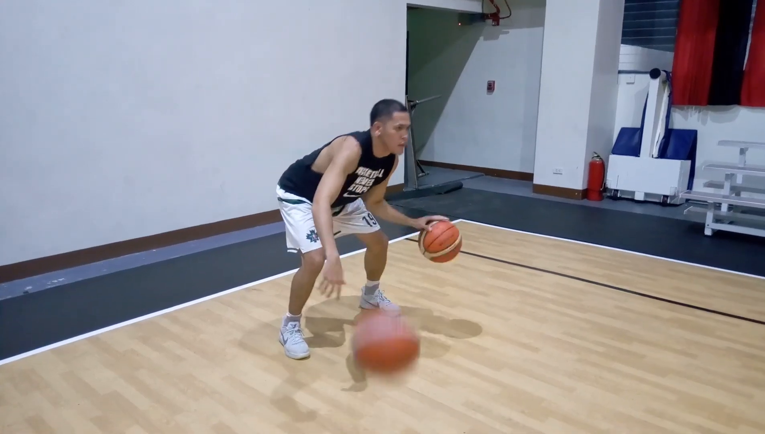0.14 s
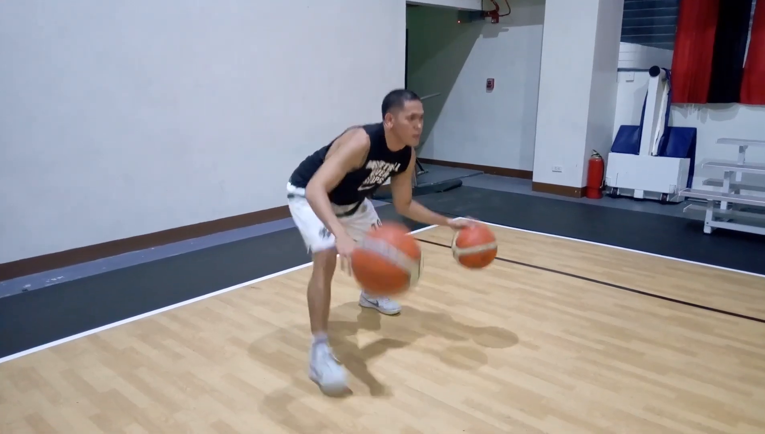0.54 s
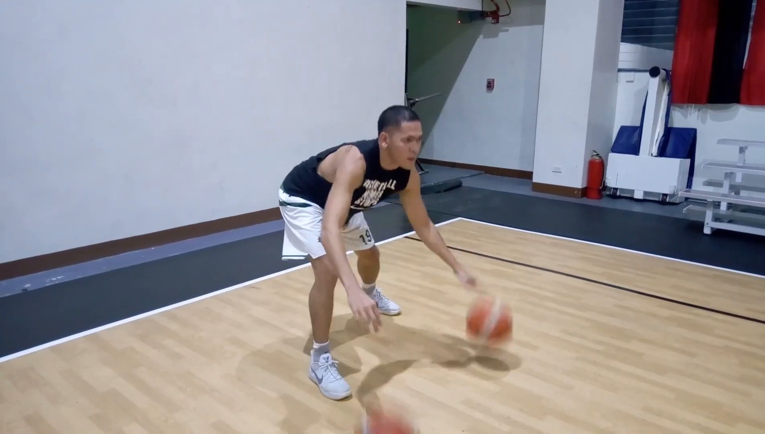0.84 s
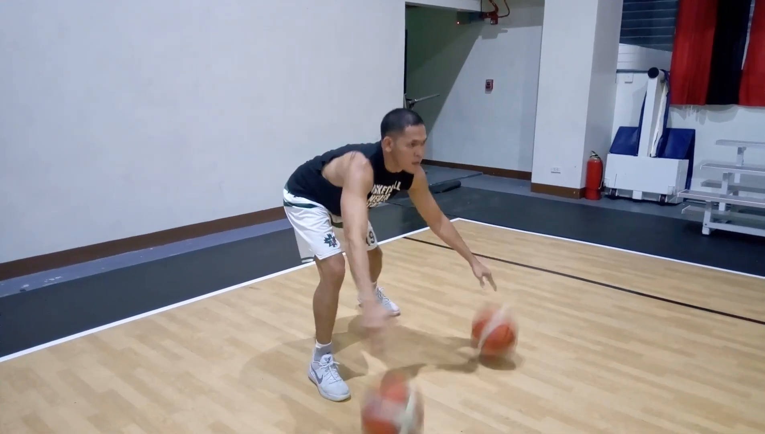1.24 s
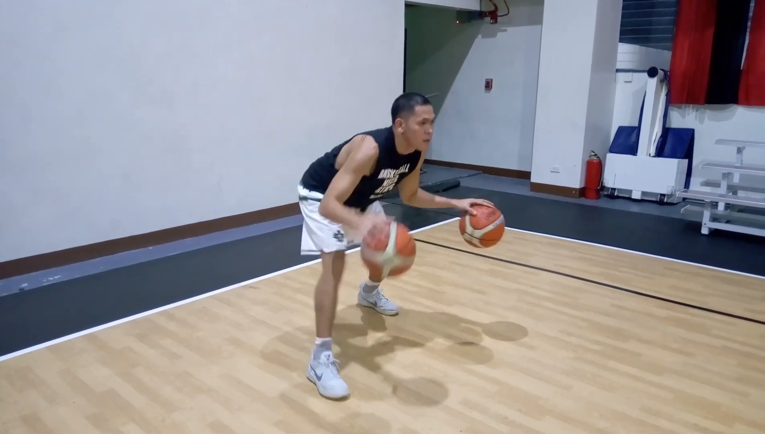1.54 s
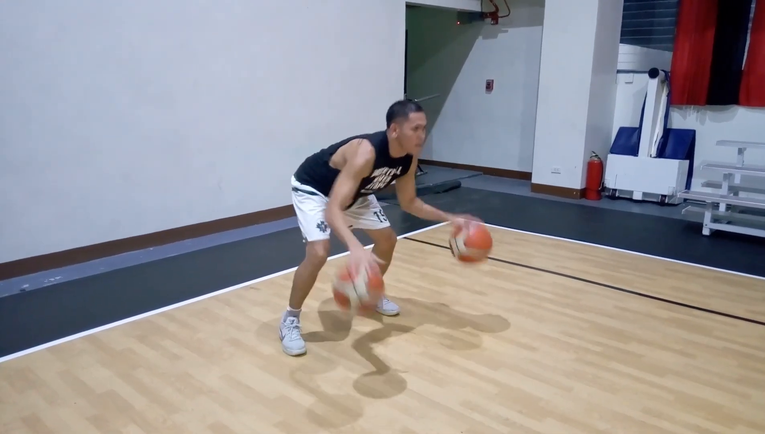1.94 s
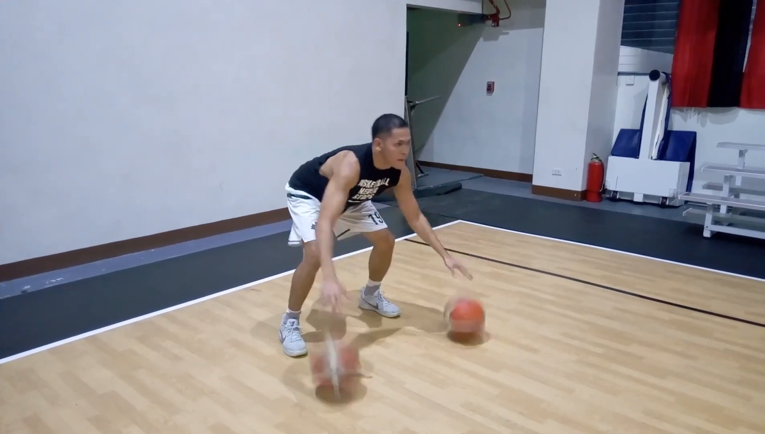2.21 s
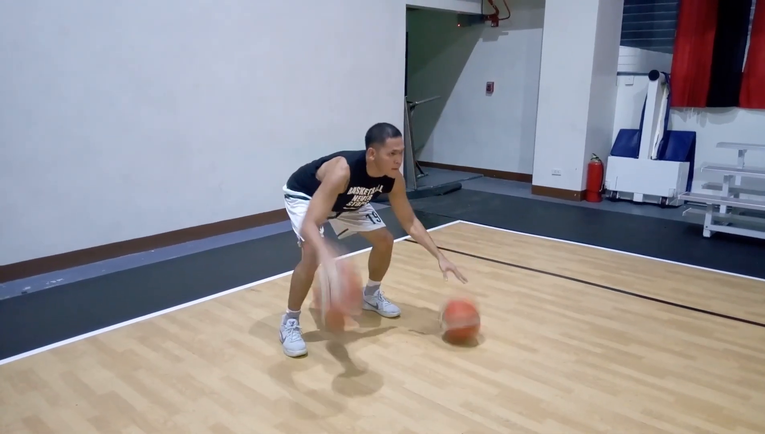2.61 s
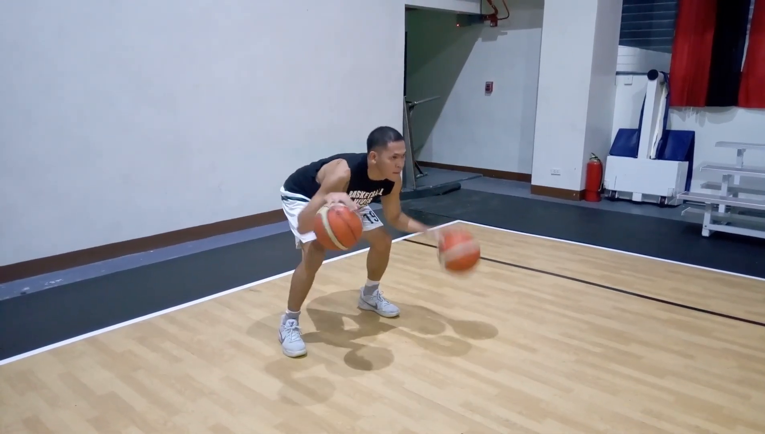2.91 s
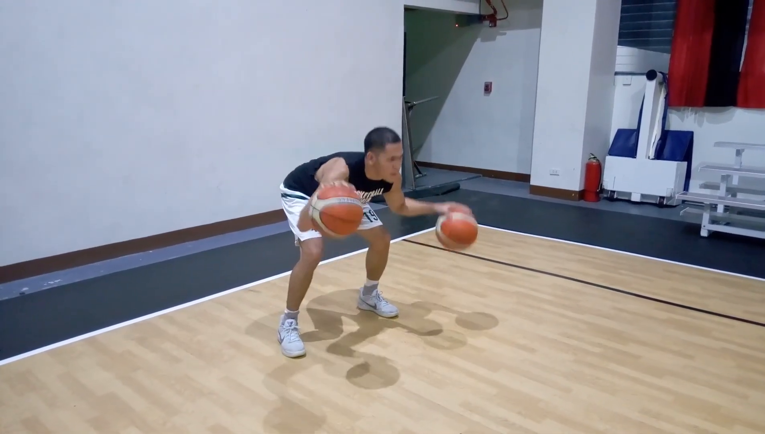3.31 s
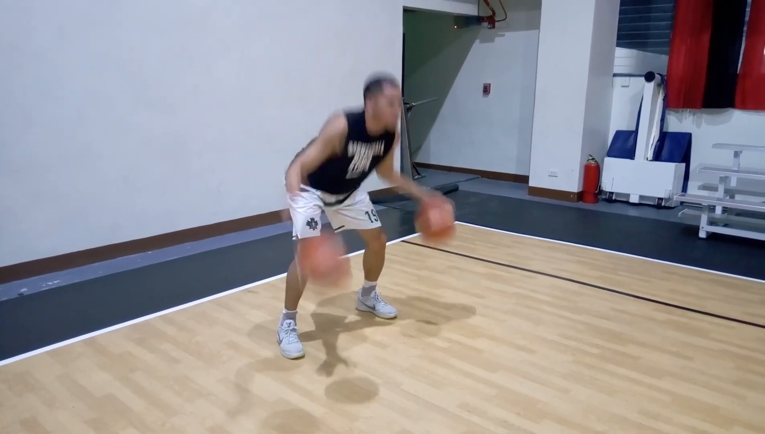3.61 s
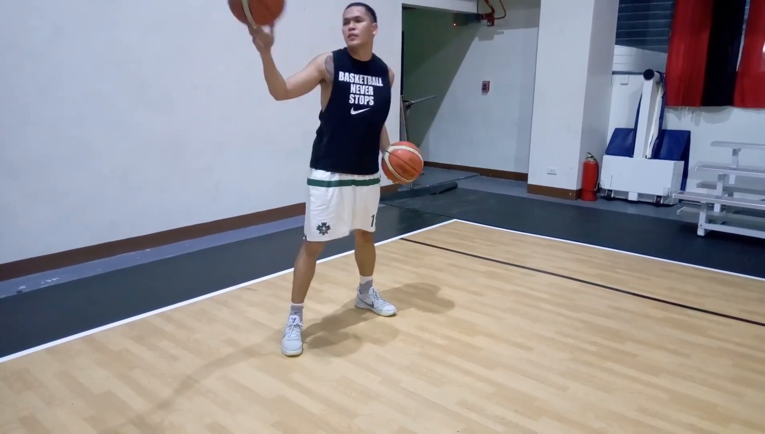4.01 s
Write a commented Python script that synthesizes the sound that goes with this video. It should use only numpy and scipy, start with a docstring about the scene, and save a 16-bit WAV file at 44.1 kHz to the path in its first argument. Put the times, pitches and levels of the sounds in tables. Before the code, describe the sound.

In a reverberant gym, two basketballs bounce on a wooden floor in an uneven, overlapping rhythm. Each hit is a sharp slap with a short hollow ring and a low thud, with duller knocks between. A shoe squeaks very briefly near one second and again near two. Echoes from earlier dribbling already hang in the air at the start; a low room rumble continues. Microphone at a moderate distance, ball hits central, reverberation spread in stereo.

```python
"""A gym hums with a steady rumble, and an earlier round of dribbling still rings in it as the scene opens.
Basketballs hit the wooden floor or a hand in an uneven rhythm, among dull thumps; a shoe squeaks at 1.2 s and 1.9 s.
Each hit is a sharp slap, a short ring of dying sines for the ball and a low thud.
Each squeak is a wavering tone with three harmonics, as rubber sticks and slips.
Dense reflections start almost at once; a near wall, single echoes and the hall's long tail join in."""
import sys
import numpy as np
from scipy import signal
from scipy.io import wavfile
from scipy.ndimage import uniform_filter1d

SR = 44100
rng = np.random.default_rng(int(sys.argv[2]) if len(sys.argv) > 2 else 0)


def output_pcm(signal):
    """Save a mono or channel-first signal as 16-bit PCM at the path in sys.argv[1].

    Samples are clipped to [-1, 1] before scaling.
    """
    pcm = np.clip(np.atleast_2d(signal).T, -1, 1) * 32767
    wavfile.write(sys.argv[1], SR, np.round(pcm).astype(np.int16))


N = 183279

# Ways the floor boards vibrate under a hit or a thump.
# Columns: multiple of the floor pitch [ratio], level_db [dB against the other modes], t60_s [s to fall 60 dB]
FLOOR_MODES = [(.7, 5.5, 0.052), (1.0, -3.5, 0.074), (1.4, -24, 0.039), (1.95, -17, 0.15),
               (2.9, 3.5, 0.0087)]


def gain_of(db):
    """Turns decibels into a factor for the wave."""
    return 10 ** (np.asarray(db) / 20)


def read(hz, points, column=1):
    """Reads a table column at any frequency, with straight lines between points on a log-frequency axis."""
    table = np.transpose(points)
    return np.interp(np.log(hz + 1), np.log(table[0] + 1), table[column])


def add(mix, s, sound):
    """Mixes a sound in at time s, cutting off what runs past the end."""
    part = mix[round(s * SR):][:len(sound)]
    part += sound[:len(part)]


def ring(modes, scale, tilt_db=0, size=6000):
    """A struck body: sines start together and die away, each at its own scaled pitch; the peak is 1."""
    t = np.arange(size) / SR
    out = np.zeros(size)
    for (f, db, t60), k in zip(modes, scale):
        level_db = db + tilt_db * np.log2(f) - 60 * t / t60  # tilt is in dB per octave
        out += gain_of(level_db) * np.sin(2 * np.pi * f * k * t)
    return out / abs(out).max()


def pair(hz, common, difference):
    """Spectra for two microphone ports: a shared part, plus a part that has opposite signs left and right."""
    # How strong the differing part is. Columns: frequency_hz [Hz], level_db [dB against the shared part]
    apart_table = [(100, -20), (1000, -14.5), (4000, -12.5), (11000, -39)]
    apart = gain_of(read(hz, apart_table))[:, None] * difference
    return np.array([common + apart, common - apart])


def rumble():
    """Steady noise of the hall, made from random spectra whose level drifts in patches of time and pitch."""
    # Colour of the noise. Columns: frequency_hz [Hz], level_db [relative dB per Hz]
    colour = [(20, -54), (75, 8.5), (125, 2.5), (300, -16), (480, -17), (750, -10.5), (2000, -21.5),
              (5000, -28), (12000, -29)]
    level_db = -46.5  # average (RMS) level
    frames, hz = N // 256 + 5, np.fft.rfftfreq(1024, 1 / SR)
    a, b, c, d, patches = rng.standard_normal((frames, 513, 5)).T
    patches = uniform_filter1d(patches, size=10, axis=0)  # smooth across pitch
    patches = uniform_filter1d(patches, size=10, axis=1) * 10  # then time; 10 restores the spread
    spectra = pair(hz, a + 1j * b, c + 1j * d)
    spectra *= gain_of(read(hz, colour)[:, None] + 1.76 * patches)
    out = signal.istft(spectra, nperseg=1024, noverlap=768)[1][:, :N]
    return gain_of(level_db) * out / out.std()


def tail(bands, start_s, seconds, scatter_db):
    """Many reflections as sparse random taps, one in every 16 samples; each band has its own level and decay."""
    slots = np.arange(0, 2 * SR, 16)
    taps = np.zeros((2, 2 * SR + 16))
    at = slots + rng.integers(0, 16, (2, len(slots)))
    signs = rng.choice([-1., 1.], at.shape)
    sizes = gain_of(scatter_db * np.minimum(rng.exponential(1, at.shape), 4))
    np.put_along_axis(taps, at, signs * sizes, 1)
    hz, t, spectra = signal.stft(taps / taps.std(), SR, nperseg=256)
    t60 = read(hz, bands, column=2)[:, None]
    energy = t60 * SR / (6 * np.log(10))  # dividing by its root makes levels independent of decay time
    fading = gain_of(read(hz, bands)[:, None] - 60 * t / t60) / np.sqrt(energy)
    out = signal.istft(pair(hz, *spectra) * fading, SR, nperseg=256)[1][:, :seconds * SR]
    fade_in = np.clip((np.arange(out.shape[1]) / SR - start_s) / 0.0018, 0, 1)
    return out * fade_in


def hall(x):
    """The room's answer: dense reflections, single echoes with cut treble and a long tail, their pattern turning."""
    # Single echoes. Columns: delay_ms [ms], level_db [dB against the sound], upper_edge_hz [Hz, at most 20000 used]
    echoes = [(23.1, -51, 27000), (43.76, -16, 5000), (183.5, -17.5, 310)]
    # Dense early reflections. Columns: frequency_hz [Hz], level_db [dB], t60_s [s to fall 60 dB]
    early = [(61, 5.5, 0.17), (198, -12, 0.67), (478, 2, 0.37), (725, -4.5, 0.21), (1300, 3.5, 0.17),
             (2140, 0.5, 0.45), (5200, -7, 0.28), (11100, -4.5, 0.24)]
    # Long tail of the hall. Columns: frequency_hz [Hz], level_db [dB], t60_s [s to fall 60 dB]
    late = [(60, -32, 2.8), (204, -18, 9), (484, -7, 1.26), (760, -5.5, 0.45), (1280, -6.5, 1.04),
            (2550, -10, 4.9), (4400, -4, 0.7), (11100, -12, 1.24)]
    earlier_round = x[2 * SR:round(2.7 * SR)]  # goes in front, so that its ringing reaches the opening
    x = np.concatenate([earlier_round, x])
    out = np.zeros((2, len(x)))
    for delay_ms, db, edge_hz in echoes:
        echo = signal.lfilter(*signal.butter(2, min(edge_hz, 20000), fs=SR), x)
        delay = round(delay_ms * SR / 1000)
        out[:, delay:] += gain_of(db) * echo[:-delay]
    turn = 2 * np.pi * np.arange(len(x)) / SR / 0.34  # one turn in 0.34 s
    for k in range(3):
        # Three random patterns trade places over time, so hits do not all echo alike.
        share = np.sqrt(2 / 3) * np.cos(turn + k * np.pi / 3)  # the three squares sum to 1
        pattern = tail(late, 0.021, seconds=2, scatter_db=3.5)
        pattern[:, :SR] += tail(early, 0.00048, seconds=1, scatter_db=5.0)
        out += signal.fftconvolve((x * share)[None], pattern, axes=1)[:, :len(x)]
    return out[:, -N:]


def thumps():
    """Dull knocks without a slap: the floor modes alone, with a softened start."""
    # Columns: start_s [s], level_db [dB, before the soft start]
    thump_table = [(0.264, -18), (0.352, -21.5), (0.557, -18.5), (1.072, -41), (1.109, -28), (1.376, -20.5),
                   (1.566, -19.5), (2.175, -25), (3.019, -27.5), (3.187, -19), (3.41, -24), (3.465, -21.5),
                   (3.953, -21)]
    pitch_hz, pitch_spread, rise_s = 119.2, 0.038, 0.0059  # the spread is a share of the pitch
    out = np.zeros(N)
    for s, db in thump_table:
        detune = 1 + pitch_spread * rng.standard_normal(len(FLOOR_MODES))
        thud = ring(FLOOR_MODES, pitch_hz * detune)
        soft_start = np.minimum(np.arange(len(thud)) / SR / rise_s, 1)
        add(out, s, gain_of(db) * thud * soft_start)
    return out


def shoe():
    """Rubber sticks and slips thousands of times a second, unevenly, slowing as the foot stops."""
    # One row a slip of the sole. Columns: start_s [s], length_s [s], swell_s [s], first_rate_hz [Hz, before waver],
    # last_rate_hz [Hz, before waver], slowing [share of the length], level_db [dB], step_db [dB per harmonic],
    # unevenness [0-1], hall_db [dB sent into the hall], wall_db [dB sent to the near walls]
    slips = [(1.172, .033, 0.011, 4270, 2994, 0.91, -30, 5.5, 0.2, -1, -9),
             (1.939, 0.03, 0.0035, 5250, 4530, 0.92, -31.5, 0.5, 0.54, -1, -21),
             (1.945, .048, 0.012, 4216, 3678, 0.81, -30.5, -5.5, .55, 5.5, -7)]
    # What the rubber sends out. Columns: frequency_hz [Hz], level_db [dB]
    sole = [(3000, -15), (3700, -7.5), (5000, -5.5), (6300, -19), (7300, -3.5), (8200, 2.5), (9400, -5),
            (10500, -16), (12500, -36)]
    # Echoes of the squeak off near walls. Columns: delay_s [s], level_db [dB, added to wall_db]
    squeak_echoes = [(.018, -9), (.0235, -14), (.0305, -9), (.041, -13)]
    slowing_bend, fall_s = 1.44, 0.016  # the slip rate drops fast at first, then levels off
    near, walls, far = np.zeros((3, N))
    for s, length, swell_s, first_hz, last_hz, slowing, db, step_db, rough, hall_db, wall_db in slips:
        t = np.arange(0, length, 1 / SR)
        noise = uniform_filter1d(rng.standard_normal((2, 3000)), size=50)
        waver, flutter = noise[:, :len(t)] * rough  # for pitch and loudness
        still_to_slow = np.maximum(1 - t / (slowing * length), 0) ** slowing_bend
        hz = last_hz + (first_hz - last_hz) * still_to_slow
        turns = np.cumsum(hz * (1 + 0.572 * waver)) / SR
        tone = np.zeros(len(t))
        for k in (1, 2, 3):
            harmonic_db = db + step_db * (k - 1.5) + read(k * hz, sole)
            tone += gain_of(harmonic_db) * np.sin(2 * np.pi * k * turns)
        swell_and_fall = np.minimum(np.minimum(t / swell_s, (length - t) / fall_s), 1)
        tone *= gain_of(16.6 * flutter) * swell_and_fall
        add(near, s, tone)
        add(far, s, gain_of(hall_db) * tone)
        for delay_s, echo_db in squeak_echoes:
            add(walls, s + delay_s, gain_of(wall_db + echo_db) * tone)
    return near + walls, far


def ball_slap(t, lead, contact_ms, skin_db):
    """The ball hits: pressure dips sharply and overshoots, then the pebbled skin crackles."""
    u = (t - lead) * 1000 / contact_ms  # time counted in contact times
    dip = np.exp(-u ** 2 / 2) - .15 * np.exp(-(u - 2.5) ** 2 / 4)
    grit = np.diff(rng.standard_normal(len(t) + 1))
    crackle = gain_of(skin_db) * grit * (u > 2) * gain_of(-60 * t / .011)
    no_bass = signal.butter(1, 300, "high", fs=SR, output="sos")  # a small contact patch sends out no bass
    return signal.sosfilt(no_bass, crackle - dip)


def ball_ring(detune, tilt_db):
    """Air and shell of the ball ring briefly, with little sound below the lowest mode."""
    # Columns: pitch_hz [Hz, before detuning], level_db [dB, before the tilt], t60_s [s to fall 60 dB]
    ball_modes = [(770, -1.5, .019), (980, -7, .013), (1190, 0, .018), (1450, -4, .014), (1720, -7, .013),
                  (2200, -11, .011), (2800, -16, .009)]
    bright = -ring(ball_modes, detune, tilt_db)
    return signal.sosfilt(signal.butter(2, 500, "high", fs=SR, output="sos"), bright)


def floor_thud(pitches_hz, delay_s):
    """The ball flattens for a few ms, a soft push that rouses only the low modes of the floor."""
    thud = ring(FLOOR_MODES, pitches_hz)
    thud = signal.sosfilt(signal.butter(2, 420, fs=SR, output="sos"), thud)
    return np.roll(thud, round(delay_s * SR))


def balls():
    """Slap, ring and thud of each hit, and apart from them what comes back off the near wall."""
    # One row a hit: a bounce, a hand catch or a strong echo. Columns: start_s [s], slap_db [dB, before filtering],
    # contact_ms [ms], ring_db [dB, before filtering], thud_db [dB, before filtering],
    # floor_pitch_hz [Hz, before detuning], wall_db [dB of the near-wall echo against the hit]
    hits = [(0.0519, -26, 0.11, -22, -24.5, 131, -8.5), (0.1507, -13, 0.078, -12.5, -16.5, 179, -12),
            (0.1546, -13.5, 0.056, -36, -17.5, 176, -10), (0.2167, -10.5, 0.082, -38, -18.5, 90.6, -14),
            (0.2253, -14.5, .05, -23, -19, 115.4, -22), (0.301, -23.5, 0.095, -45, -27.5, 87, -11),
            (0.5118, -17.5, 0.075, -18.5, -20, 107.9, -20), (.548, -14, 0.057, -28, -24.5, 110, -31),
            (.5844, -26, 0.052, -46, -35, 159, -20), (0.7612, -21, 0.054, -32, -37.5, 136, -4),
            (0.8569, -14.5, 0.064, -25, -21.5, 112.6, -28), (.866, -25, 0.05, -44, -45, 116, -26),
            (0.9438, -23, 0.056, -16, -19, 109.4, -8), (0.9918, -14.5, 0.058, -23.5, -22, 126, -19),
            (1.028, -21, 0.086, -42, -28.5, 136.4, -22), (1.052, -23, 0.097, -20, -19, 129.6, -20),
            (1.1291, -18, 0.082, -32, -25, 122, -11), (1.3298, -15.5, 0.041, -25.5, -22, 114, -17),
            (1.3667, -27.5, 0.068, -31, -30, 101, -10), (1.4212, -19, 0.062, -21, -26, 139, -20),
            (1.4349, -9.5, 0.068, -18.5, -25, 106.5, -28), (1.4436, -39, 0.053, -20, -15, 114.5, -24),
            (1.5267, -15, 0.062, -34, -19.5, 112.7, -25), (1.5424, -21.5, 0.057, -17.5, -37, 101, -13),
            (1.941, -20, 0.068, -17.5, -24, 116, -18), (1.9785, -12, 0.079, -14, -16, 88.4, -4.5),
            (2.361, -9, 0.072, -14, -15, 109.6, -25), (2.3726, -26, 0.11, -17.5, -19.5, 97, -5),
            (2.425, -18.5, 0.066, -27, -19.5, 118.7, -17.5), (2.746, -19, 0.061, -17.5, -18.5, 111, -23),
            (2.8036, -8.5, 0.069, -15, -18, 124, -5.5), (2.8323, -14.5, 0.066, -33, -17, 112, -13),
            (3.148, -23.5, 0.18, -17.5, -23.5, 129.7, -3), (3.206, -14.5, .06, -18, -15.5, 112, -9),
            (3.2414, -17.5, 0.089, -23, -23.5, 109.5, -22), (3.352, -12.5, 0.067, -27.5, -17, 138, -18),
            (3.629, -15, 0.086, -20, -19.5, 114, -5.5), (3.662, -8.5, 0.065, -10.5, -9.5, 114.7, -10),
            (3.9802, -24.5, 0.057, -25, -22, 121, -8), (4.0672, -31.5, 0.064, -46, -33, 166, -13)]
    skin_level_db, skin_follows_ring = -4.5, 0.25  # crackle against slap; dB per dB of ring over slap
    ring_tilt_db, ring_tilt_spread_db = -0.5, 5  # per octave; the spread from hit to hit
    wall_delay_s, wall_spread_s, wall_thud = .0145, 0.00067, 0.78  # wall_thud: share of the thud that returns
    floor_lag_s = .0003  # the floor answers just after the slap
    lead = 20 / SR  # room in front of the slap for its rise
    direct, wall, t = np.zeros(N), np.zeros(N), np.arange(400) / SR
    for s, slap_db, contact_ms, ring_db, thud_db, floor_hz, wall_db in hits:
        ball_detune = 1 + .045 * rng.standard_normal(7)  # no two hits ring alike
        floor_detune = 1 + .045 * rng.standard_normal(len(FLOOR_MODES))
        tilt_db = ring_tilt_db + ring_tilt_spread_db * rng.standard_normal()
        delay_s = wall_delay_s + wall_spread_s * rng.standard_normal()
        skin_db = skin_level_db + skin_follows_ring * (ring_db - slap_db)
        bright = gain_of(ring_db) * ball_ring(ball_detune, tilt_db)
        add(bright, 0, gain_of(slap_db) * ball_slap(t, lead, contact_ms, skin_db))
        thud = gain_of(thud_db) * floor_thud(floor_hz * floor_detune, lead + floor_lag_s)
        add(direct, s - lead, bright + thud)
        add(wall, s - lead + delay_s, gain_of(wall_db) * (bright + wall_thud * thud))
    return direct, wall


def scene():
    """Ball hits, squeaks, thumps and near walls in the middle, the hall and its rumble around them."""
    background = rumble()
    squeak, far = shoe()
    direct, wall = balls()
    middle = direct + squeak + wall + thumps()
    return middle + hall(direct + far) + background


def record(dry):
    """Two small microphone ports colour the sound, the left weaker in the bass; then the top treble is cut."""
    # Colour of both ports. Columns: frequency_hz [Hz], level_db [dB]
    mic = [(25, -26), (45, -17), (70, -6.5), (150, 7), (3500, -0.12), (5100, 4.5), (6300, -3.5),
           (7300, 0.5), (8300, 2), (9400, -8), (10800, -7)]
    # Difference of the ports. Columns: frequency_hz [Hz], level_db [dB, left minus right]
    lean = [(60, -2.5), (120, -3), (220, -1.5), (430, -0.5), (830, 1), (1610, 0.5), (3110, 0), (6000, -0.5),
            (11600, -3)]
    edge_hz = 11200
    hz = abs(np.fft.fftfreq(8192, 1 / SR))
    port_db = read(hz, mic) + np.outer([.5, -.5], read(hz, lean))
    log_gain = np.log(gain_of(port_db))
    spectra = np.exp(np.conj(signal.hilbert(log_gain)))  # phase follows the gain: nothing sounds early
    ports = np.fft.ifft(spectra).real[:, :4096]
    heard = signal.oaconvolve(dry, ports, axes=1)[:, :N]
    band_limit = signal.firwin(301, edge_hz, window=("kaiser", 8), fs=SR)
    return signal.oaconvolve(heard, band_limit[None], "same")


dry = scene()
out = record(dry)
output_pcm(out)
```